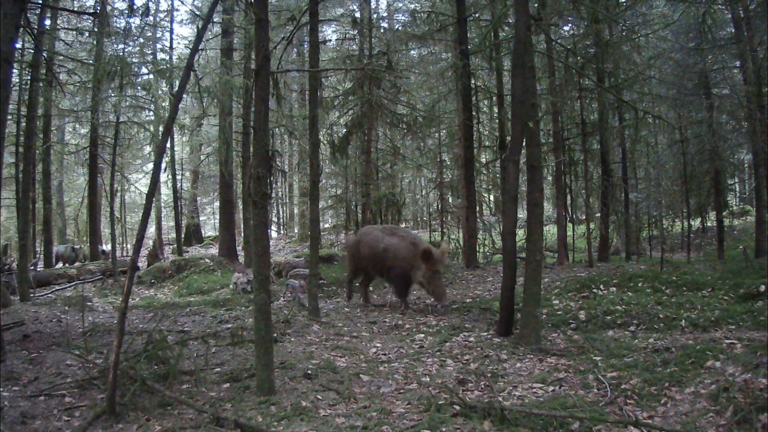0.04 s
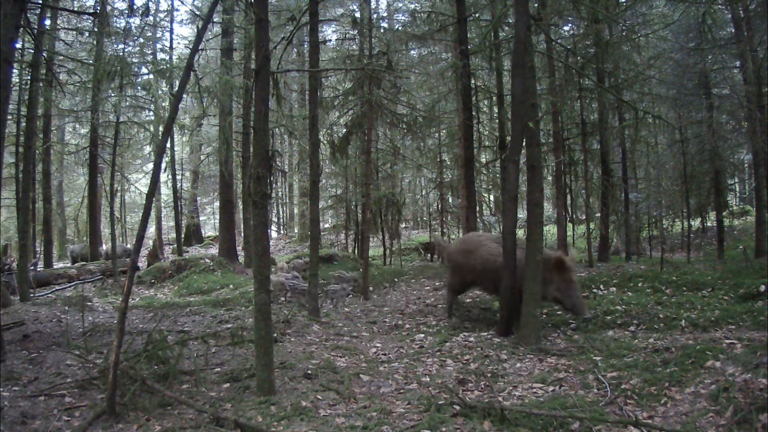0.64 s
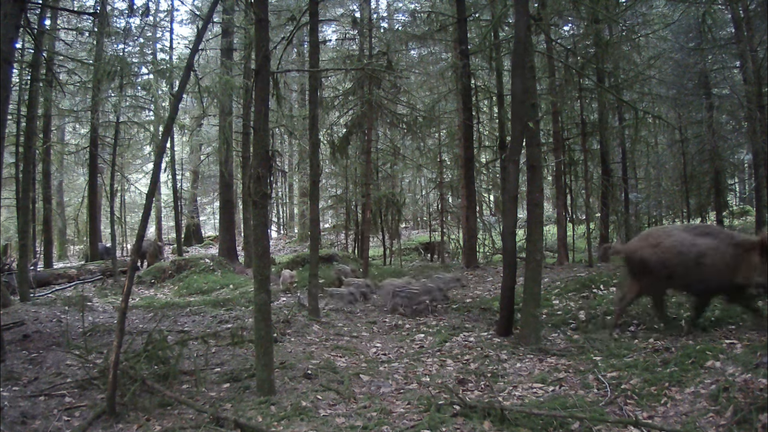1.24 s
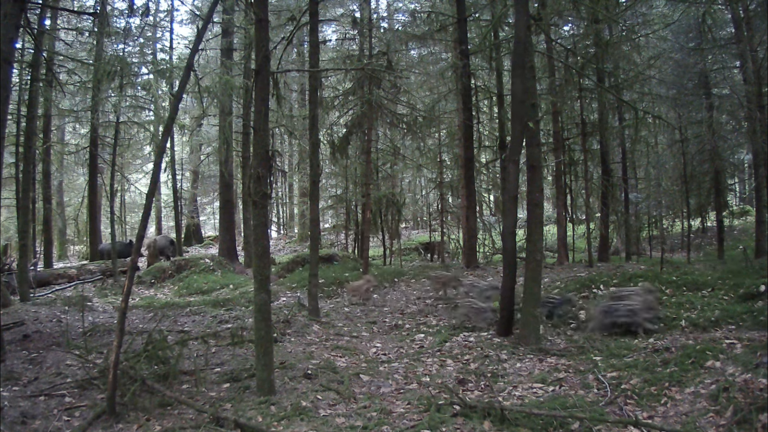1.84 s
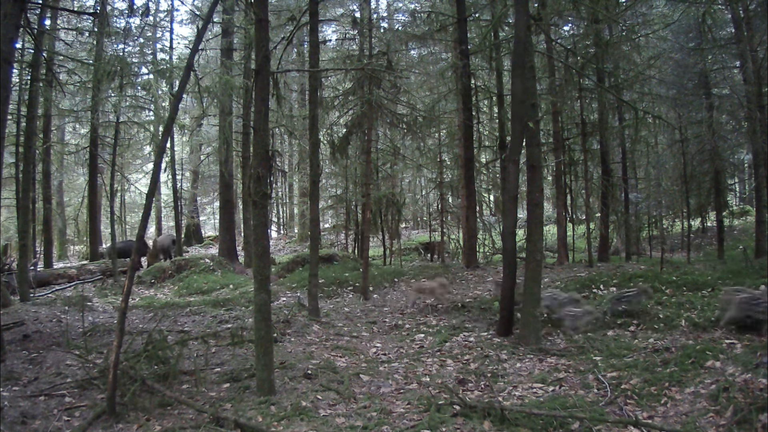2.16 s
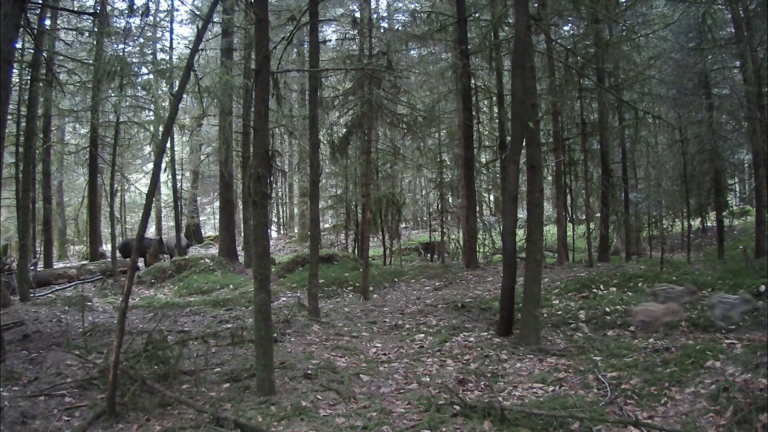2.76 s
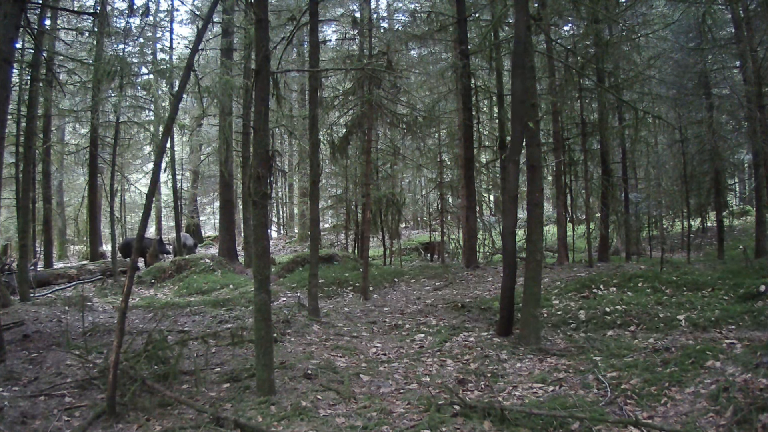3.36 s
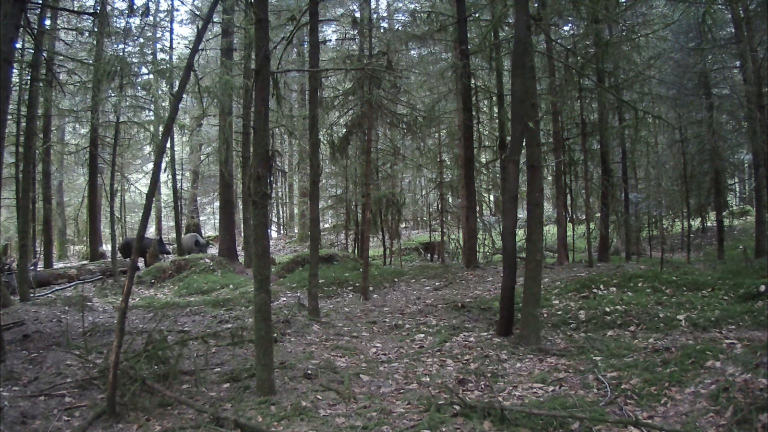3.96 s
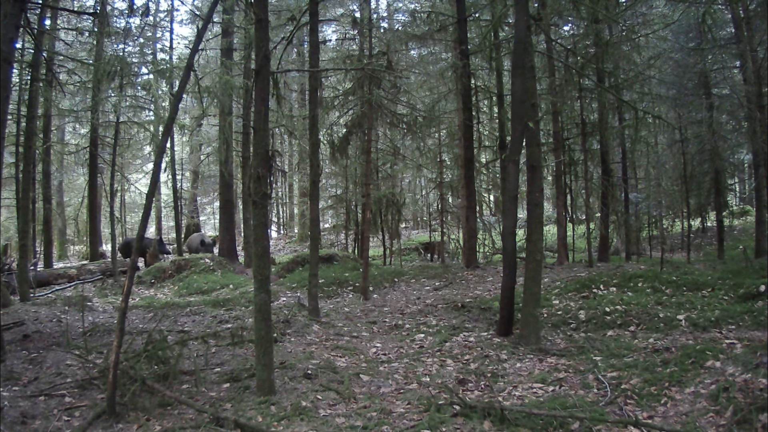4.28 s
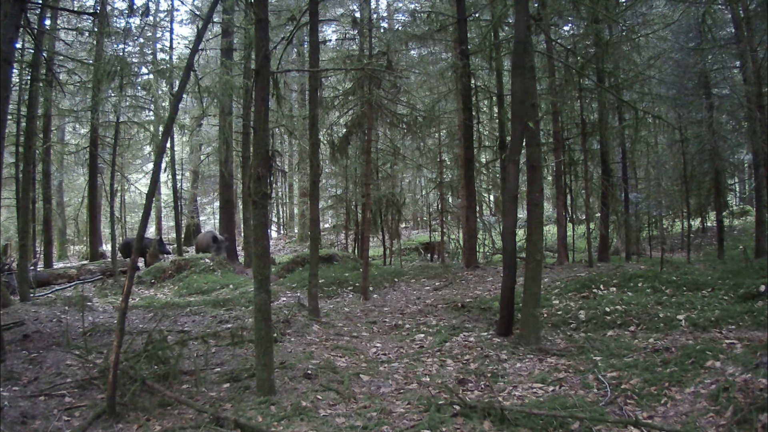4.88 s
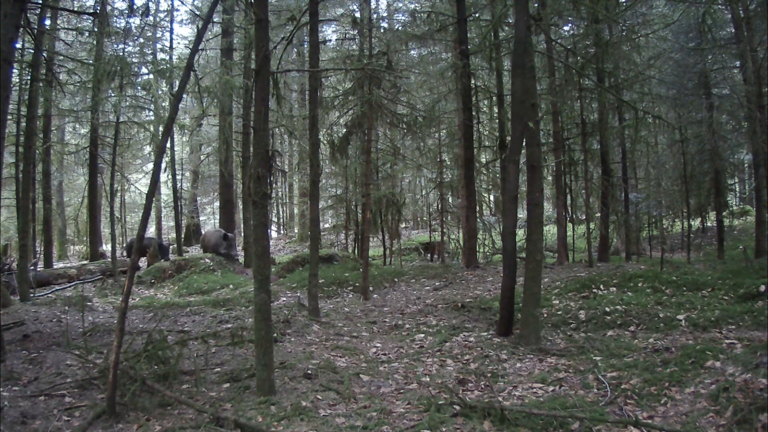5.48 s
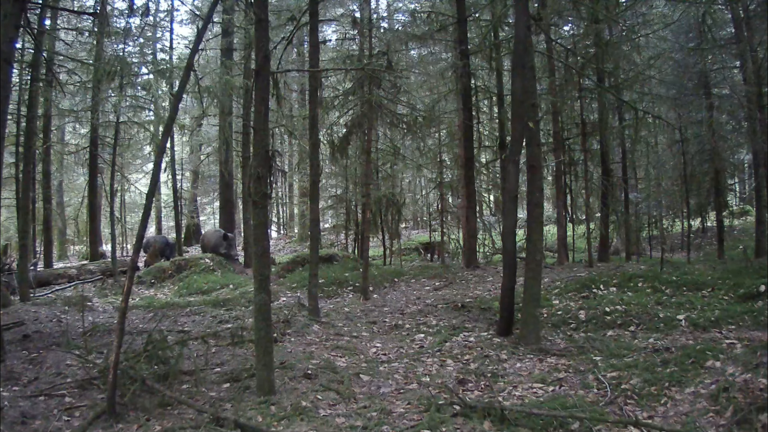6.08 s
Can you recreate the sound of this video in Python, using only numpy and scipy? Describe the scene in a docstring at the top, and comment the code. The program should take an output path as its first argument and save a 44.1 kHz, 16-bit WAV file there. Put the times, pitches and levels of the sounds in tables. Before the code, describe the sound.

At about 0.1 seconds a microphone in a forest comes alive with a low bump and a hiss, followed by five electrical pops that weaken up to 0.8 seconds. The hiss settles to a soft, steady level by about 1.5 seconds. From 0.3 seconds wild boars trot past nearby: dry leaves crunch, twigs snap sharply and hooves thud on soft soil over a low rumble. The steps are loudest between 0.4 and 1.3 seconds, with weaker passes around 1.8, 2.6 and 3 seconds, a last small snap near 3.8 and a last thud just after 4. Distant birds whistle and trill throughout, echoing lightly among the trunks, busy in the first second and thinning out until about 3.2. After 4 seconds only hiss and the very faint rustle of the far herd remain, with a few quiet bird notes from 5.3 to 6 seconds.

```python
"""A small camera on a tree in a spruce wood wakes: its hiss comes up, its input swings and pops.
Birds sing far off, their notes lingering among the trunks. Wild boars trot past through dry litter:
leaves crunch, twigs snap and hooves thud on the soft soil, while the hiss sinks as the input settles.
After four seconds the boars are gone, leaving the faint rooting of the far herd and a few last birds."""
import sys
import numpy as np
from scipy import signal
from scipy.fft import rfft, irfft, next_fast_len
from scipy.io import wavfile

SR = 44100
rng = np.random.default_rng(int(sys.argv[2]) if len(sys.argv) > 2 else 0)


def waveform_to_disk(signal):
    """Save audio, clipped to [-1, 1], as 16-bit WAV at the path in sys.argv[1]."""
    frames = np.transpose(np.atleast_2d(signal))
    scaled = np.clip(frames, -1, 1) * 32767
    samples = np.round(scaled).astype(np.int16)
    wavfile.write(sys.argv[1], SR, samples)


N = 274302

def from_db(db):
    """Decibels to gain."""
    return 10 ** (np.asarray(db) / 20)

def rms_one(x):
    """Scale to an rms of 1."""
    return x / np.sqrt(np.mean(x ** 2) + 1e-20)

def add(track, s, sound):
    """Mix a sound into a track at a time."""
    at = max(0, round(s * SR))
    track[at:at + len(sound)] += sound[:N - at]

def seconds(length):
    """Time axis of a short sound."""
    return np.arange(int(length * SR)) / SR

def rise(s, rise_s):
    """A smooth step from 0 to 1 around a moment."""
    return .5 + .5 * np.tanh((np.arange(N) / SR - s) / (2 * rise_s))

def drift(t, rate):
    """A random wander with a spread near 1, turning rate times a second."""
    knots = rng.standard_normal(1000)
    return np.interp(t * rate, np.arange(len(knots)), knots)

def colour(x, spectrum):
    """Causal (minimum-phase) filter with this spectrum and unit power gain."""
    size = next_fast_len(N + SR // 4) // 2 * 2
    hz, db = np.transpose(spectrum)
    bin_hz = np.arange(size // 2 + 1) * SR / size
    gain = rms_one(from_db(np.interp(np.log(bin_hz + 1), np.log(hz), db)))
    cepstrum = irfft(np.log(gain))
    cepstrum[1:size // 2] *= 2
    cepstrum[size // 2 + 1:] = 0
    return irfft(rfft(x, size) * np.exp(rfft(cepstrum)))[:N]

# The noise floor of the microphone input. Each row: frequency in Hz, relative level in dB.
HISS_SPECTRUM = [(15, -24), (28, 3), (55, 0), (105, -7.5), (170, -9.5), (330, -12), (500, -14.5),
                 (1050, -17.5), (2200, -20), (4500, -23), (9000, -27), (14400, -29.5), (16000, -40.5)]
def hiss(rest_db=-61, excess_db=9, settle_s=0.94):
    """The input's own noise, louder until it has settled."""
    t = np.arange(N) / SR
    db = rest_db + excess_db * np.exp(-(t / settle_s) ** 2)
    return from_db(db) * colour(rng.standard_normal(N), HISS_SPECTRUM)

# Electrical pops inside the camera. Each row: start in seconds, level in dB, direction as 1 or -1.
INPUT_POPS = [(.1645, -23, 1), (0.3606, -27.5, 1), (0.4254, -30.5, -1), (0.6571, -36, -1),
              (0.7756, -38.5, -1)]
def settling(swing_s=0.091, offset_db=-24.5, drain_s=0.4, pop_s=0.0017, tail_s=0.0243):
    """The input's offset swings negative and drains away; each pop is a sudden jump riding on it."""
    age, t = np.abs(np.arange(N) / SR - swing_s), seconds(.2)
    out = -from_db(offset_db) * rise(swing_s, rise_s=0.0031) * np.exp(-(age / drain_s) ** 1.24)
    pop = np.exp(-t / pop_s) + 0.38 * np.exp(-t / tail_s)
    for s, db, direction in INPUT_POPS:
        add(out, s, np.sign(direction) * from_db(db) * pop)
    return out

def sing(t, hz, db, attack_share=0.3, release_s=0.011, flutter_db=1.5, crescendo_db=1.5):
    """One pure bird note on a pitch path; it swells as it goes and flutters a little."""
    length = t[-1]
    ramps = np.minimum(t / (attack_share * length), (length - t) / release_s)
    swell = np.sin(np.pi / 2 * np.clip(ramps, 0, 1))
    level = from_db(db + crescendo_db * (t / length - .5) + flutter_db * drift(t, rate=56.5))
    return level * swell * np.sin(2 * np.pi * np.cumsum(hz) / SR)

# Clear bird notes from deep in the wood.
# Each row: start and length in seconds, first and held pitch in Hz, level in dB.
FAR_WHISTLES = [(0.134, 0.083, 6700, 6398, -54), (0.276, .1, 1412, 1730, -52),
                (0.468, 0.099, 1947, 2254, -45.5), (0.664, 0.099, 2110, 1931, -46.5),
                (0.762, 0.1, 1866, 2202, -45.5), (1.048, 0.093, 2705, 3043, -49),
                (1.442, .085, 1527, 2050, -60.5), (1.643, 0.083, 1985, 1940, -56.5),
                (1.73, 0.039, 2017, 2540, -55.5), (2.302, .045, 4080, 4070, -60.5),
                (2.353, 0.033, 2473, 2347, -60.5), (2.394, 0.036, 2390, 2130, -59.5),
                (2.43, 0.036, 2520, 1955, -61), (2.764, 0.195, 1967, 2256, -54),
                (3.124, 0.1, 1968, 1832, -58.5), (5.3, 0.072, 7100, 7230, -71),
                (5.627, 0.082, 3630, 3670, -65)]
def whistles(slide_s=0.02754, waver=0.0069):
    """Each whistle slides onto its pitch and wavers there."""
    out = np.zeros(N)
    for s, length, start_hz, held_hz, db in FAR_WHISTLES:
        t = seconds(length)
        hz = held_hz + (start_hz - held_hz) * np.exp(-t / slide_s)
        add(out, s, sing(t, hz * (1 + waver * drift(t, rate=77)), db))
    return out

# Warbled bird notes, far from the microphone.
# Each row: start and length in seconds, first and last pitch in Hz, level in dB, warble depth in Hz.
FAR_TRILLS = [(.26, 0.052, 6300, 4954, -56.5, 350), (0.323, .115, 4835, 3200, -53, 303),
              (0.37, .11, 1564, 1925, -51.5, 131), (0.546, 0.094, 4400, 4420, -58.5, 80),
              (.651, .09, 4110, 4170, -63, 220), (.955, .15, 2722, 2856, -55, 60.6),
              (1.23, 0.16, 4719, 4330, -67.5, 121), (1.769, .27, 2415, 2294, -67.5, 70),
              (1.929, .185, 1935, 1575, -62, 44), (2.33, 0.029, 2970, 3270, -61.5, 150),
              (2.384, .14, 2850, 2516, -65, 220), (3.041, 0.089, 3320, 3352, -60.5, 69),
              (5.5, .1, 5135, 5000, -75, 220), (5.698, 0.11, 3900, 3880, -67, 50.4),
              (5.876, 0.23, 3420, 3120, -74.5, 218)]
def trills(warble_hz=55, roughness=0.513):
    """Each trill sweeps evenly while its pitch warbles fast and unevenly."""
    out = np.zeros(N)
    for s, length, start_hz, end_hz, db, depth_hz in FAR_TRILLS:
        t = seconds(length)
        warble = np.sin(2 * np.pi * warble_hz * t + drift(t, rate=60)) + roughness * drift(t, rate=250)
        add(out, s, sing(t, np.linspace(start_hz, end_hz, len(t)) + depth_hz * warble, db))
    return out

# Boars running past the tree, each a swell and fade.
# Each row: loudest moment and half length in seconds, rustle and ground rumble in dB.
BOAR_PASSES = [(0.535, 0.51, -58.5, -52.5), (1.807, 0.3, -61.5, -57.5), (2.558, 0.3, -63.5, -58),
               (3.0, .48, -68.5, -61.5), (3.66, .5, -78, -61)]
def herd(far_rustle_db=-91, far_rumble_db=-74, rumble_reach=1.23):
    """Gains of rustle and rumble: the powers of passing boars and the far herd add up."""
    t = np.arange(N) / SR
    leaves, ground = from_db(far_rustle_db) ** 2, from_db(far_rumble_db) ** 2
    for s, half_length, rustle_db, rumble_db in BOAR_PASSES:
        away = ((t - s) / half_length) ** 2
        leaves += from_db(rustle_db) ** 2 * np.exp(-away)
        ground += from_db(rumble_db) ** 2 * np.exp(-away / rumble_reach ** 2)  # thuds carry longer
    return np.sqrt(leaves), np.sqrt(ground)

# The forest floor under distant hooves. Each row: frequency in Hz, relative level in dB.
GROUND_SPECTRUM = [(20, 0), (50, -3.5), (80, 1), (108, -1), (160, -9), (300, -14), (600, -23), (1500, -41)]
def trampling(gain, lumpy_db=3.5):
    """The herd's footfalls merge into a lumpy rumble in the ground."""
    lumps = gain * from_db(lumpy_db * drift(np.arange(N) / SR, rate=22))
    return colour(lumps * rng.standard_normal(N), GROUND_SPECTRUM)

def fractures(per_s, spread_db, count):
    """Tiny leaf fractures at random moments, a few much larger than the rest; rms 1."""
    sizes = from_db(spread_db * np.minimum(rng.exponential(1, count), 4.5))
    signs = rng.choice([-1, 1], count)
    return rms_one(sizes * signs * (rng.random(count) < per_s / SR))

# Dry leaf litter as heard from the tree. Each row: frequency in Hz, relative level in dB.
LEAF_SPECTRUM = [(300, -9), (1000, -9), (2200, -2), (4000, 1.5), (5000, -4), (6600, 2.5), (8800, -8.5),
                 (11000, -6), (13000, -23.5), (16000, -11)]
def rustle(gain, patchy_db=3.4):
    """Many feet further off keep the litter crackling in clumps."""
    clumps = gain * from_db(patchy_db * drift(np.arange(N) / SR, rate=45))
    return colour(clumps * fractures(per_s=3500, spread_db=4.5, count=N), LEAF_SPECTRUM)

# Steps in the leaves close to the microphone. Each row: start in seconds, level in dB.
LEAF_STEPS = [(0.265, -55), (.385, -54), (0.485, -53), (.651, -50.5), (.815, -52), (.885, -55),
              (1.119, -59), (1.171, -48), (1.585, -55.5), (1.612, -50), (1.682, -52), (1.939, -50),
              (1.995, -52.5), (2.083, -61), (2.435, -54), (2.516, -55), (2.538, -50), (2.575, -55),
              (2.606, -57.5), (2.817, -58), (2.959, -55.5), (2.997, -52.5), (3.124, -56.5), (3.186, -62),
              (3.76, -61.5)]
def crunches(rise_s=0.0061):
    """A foot crushes a patch of leaves: a quick swell of dense fractures."""
    out, t = np.zeros(N), seconds(0.29)
    swell = t / rise_s * np.exp(1 - t / rise_s)
    for s, db in LEAF_STEPS:
        add(out, s, from_db(db) * swell * fractures(per_s=7000, spread_db=2.0, count=len(t)))
    return colour(out, LEAF_SPECTRUM)

# Twigs and stalks along the boars' path. Each row: start in seconds, level in dB, pitch in Hz.
TWIG_SNAPS = [(.395, -35, 6200), (0.4259, -27.5, 5900), (.592, -35.5, 6500), (.82, -36.5, 6870),
              (1.1797, -29, 5900), (1.62, -37, 3640), (1.685, -41, 6500), (1.7799, -36.5, 7040),
              (2.139, -39, 6900), (2.153, -47, 4800), (2.543, -35.5, 7560), (2.552, -35.5, 6640),
              (2.597, -37.5, 5500), (3.073, -37.5, 7650), (3.138, -38.5, 4380), (3.768, -49, 5540)]
def snaps(crack_s=0.0006, splinter_db=-20, splinter_s=0.0034, air_hz=8600):
    """A stalk cracks, then splinters briefly, coloured by its broad resonance and dulled by distance."""
    out, t = np.zeros(N), seconds(.04)
    air = signal.butter(3, air_hz, fs=SR)
    decay = np.exp(-t / crack_s) + from_db(splinter_db) * np.exp(-t / splinter_s)
    for s, db, hz in TWIG_SNAPS:
        burst = rng.standard_normal(len(t)) * decay
        stalk = signal.lfilter(*signal.iirpeak(hz, Q=1.9, fs=SR), burst)
        crack = signal.lfilter(*air, stalk)
        add(out, s, from_db(db) * crack / np.abs(crack).max())
    return out

# The heaviest hoof falls, near the tree. Each row: start in seconds, level in dB, pitch in Hz.
HOOF_FALLS = [(0.576, -38, 124), (.838, -30.5, 300), (0.846, -37.5, 163), (.888, -40.5, 540),
              (.897, -35, 172), (0.98, -37, 396), (1.023, -44.5, 387), (1.055, -47.5, 117),
              (1.241, -43.5, 115), (1.316, -43.5, 123), (1.587, -46, 112), (1.959, -49.5, 149),
              (2.457, -47.5, 98), (2.62, -39.5, 450), (3.135, -46, 91), (3.359, -53.5, 345),
              (3.446, -49.5, 96.5), (3.785, -51.5, 97), (3.968, -56, 102), (4.086, -55.5, 108)]
def hooves(soil_hz=115, soil_cycles=6.6, sag=0.25, puff_db=-10, puff_hz=700, puff_s=.0022):
    """Each hoof sets the soil ringing, its pitch sagging as the weight sinks in, with a puff of crumbs."""
    hardest_db = max(db for _, db, _ in HOOF_FALLS)
    out, t = np.zeros(N), seconds(0.25)
    dull = signal.butter(2, puff_hz, fs=SR, output="sos")
    for s, db, hz in HOOF_FALLS:
        cycles = soil_cycles * (soil_hz / hz) ** 0.61  # soft soil rings low and long, firm high and short
        age = t * hz / cycles
        phase = 2 * np.pi * np.cumsum(hz * (1 + sag * (np.exp(-4 * age) - .5))) / SR
        swell = (1 - np.exp(-t * hz * 3.3)) ** 2 * from_db(-45 * age)
        thud = swell / swell.max() * np.sin(phase)
        crumbs = rms_one(signal.sosfilt(dull, rng.standard_normal(len(t))))
        crumbling = from_db(puff_db + 0.57 * (db - hardest_db))  # grows with the force
        puff = crumbling * crumbs * (t / puff_s) * np.exp(1 - t / puff_s)
        add(out, s, from_db(db) * (puff - thud))
    return out

def wood(x, t60, wet_db, direct_db):
    """The direct sound and a dying crowd of echoes from the trunks."""
    t = seconds(1.3)
    decay = from_db(-60 * t / t60) * (1 - np.exp(-t / 0.0052))
    echoes = rms_one(rng.standard_normal(len(t)) * decay) / np.sqrt(len(t))
    return from_db(direct_db) * x + from_db(wet_db) * signal.fftconvolve(x, echoes)[:N]

def scene():
    """One microphone waking on a tree: boars near by, birds deep in the wood, hiss beneath."""
    rustle_gain, rumble_gain = herd()
    litter = wood(crunches() + snaps() + rustle(rustle_gain), t60=0.28, wet_db=-10.5, direct_db=-2.5)
    ground = wood(hooves(), t60=0.26, wet_db=-13, direct_db=0.5) + trampling(rumble_gain)
    song = wood(whistles(), t60=1.13, wet_db=-1.5, direct_db=0.76)
    song += wood(trills(), t60=.9, wet_db=-0.06, direct_db=-0.5)
    awake = from_db(-47.5) + rise(0.086, rise_s=0.0047)  # nearly mute until the input comes alive
    return (awake * (litter + ground + song + hiss()) + settling())[None]

def record(dry):
    """The top is cut steeply above 15.6 kHz."""
    return signal.sosfilt(signal.ellip(10, .2, 70, 15600, fs=SR, output="sos"), dry)

dry = scene()
out = record(dry)
waveform_to_disk(out)
```